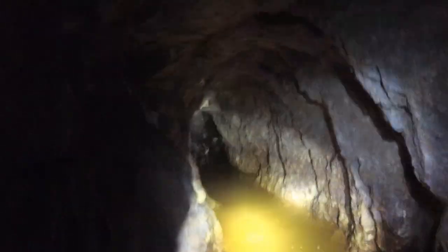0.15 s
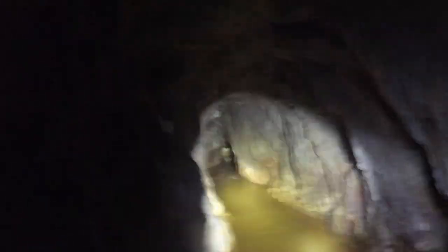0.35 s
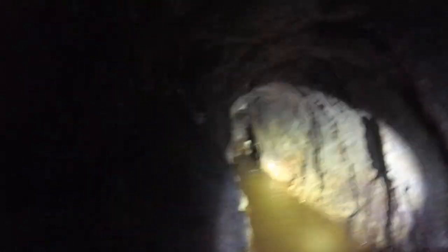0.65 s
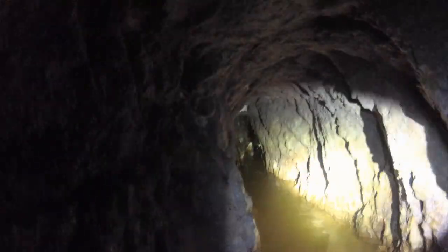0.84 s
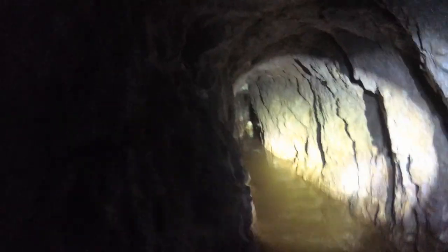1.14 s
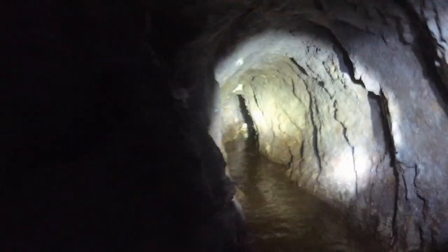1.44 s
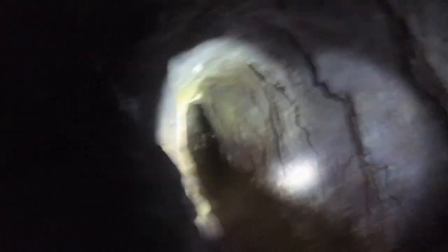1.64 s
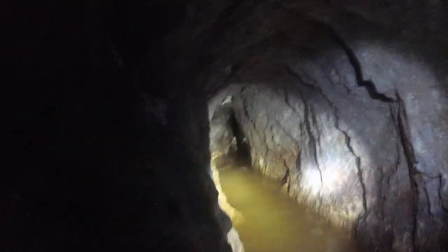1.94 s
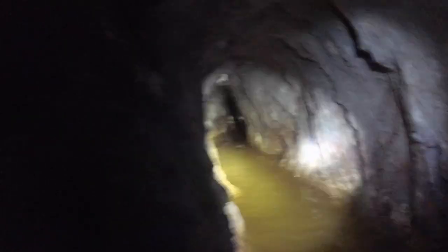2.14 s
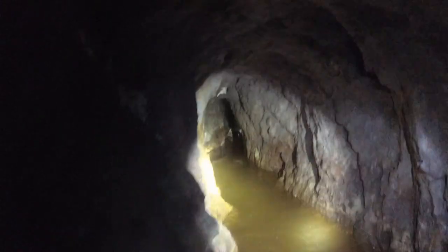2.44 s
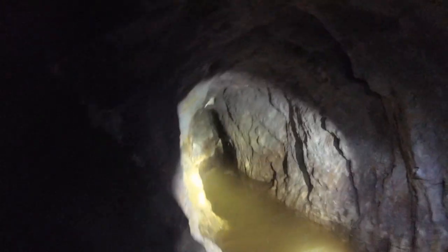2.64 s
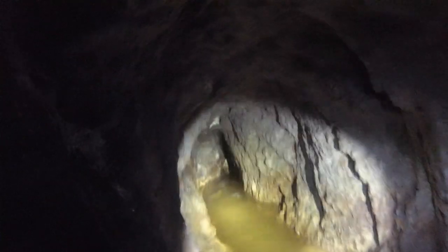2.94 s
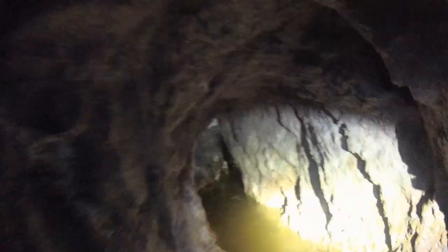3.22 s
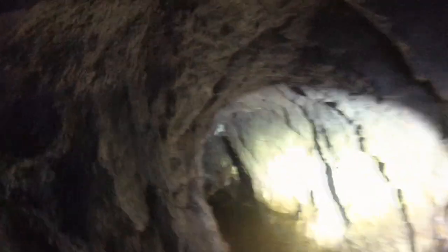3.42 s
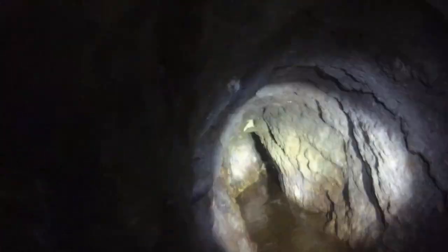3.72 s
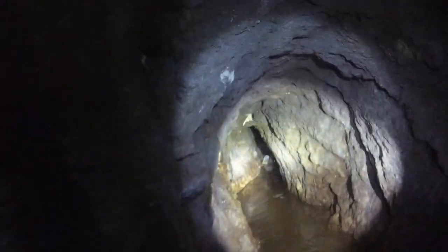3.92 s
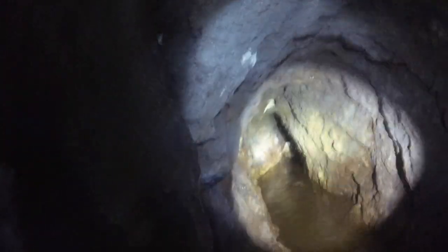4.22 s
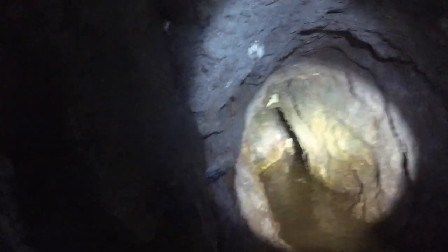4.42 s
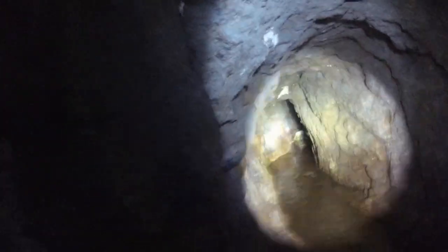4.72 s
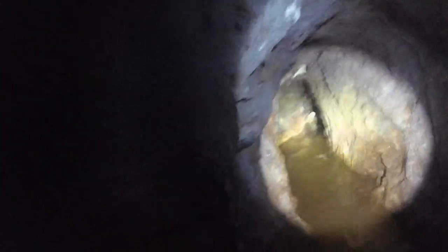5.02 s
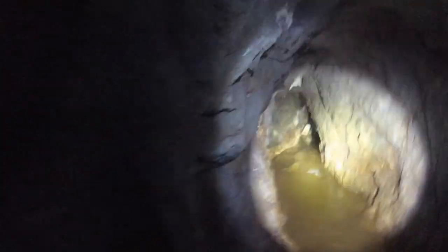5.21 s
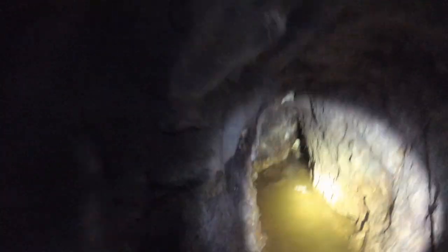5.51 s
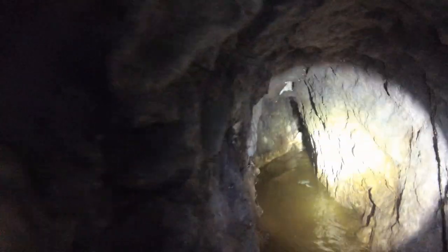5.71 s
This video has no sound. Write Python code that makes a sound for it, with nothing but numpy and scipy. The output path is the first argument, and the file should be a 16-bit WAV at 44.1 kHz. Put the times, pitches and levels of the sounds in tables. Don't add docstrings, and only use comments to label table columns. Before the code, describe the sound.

Someone wades slowly through a flooded rock tunnel, water sloshing and bubbling, while the camera case ticks, thumps and bangs loudly against rock.

```python
import sys
import numpy as np
from scipy import signal
from scipy.fft import rfft, irfft, next_fast_len
from scipy.io import wavfile
from scipy.ndimage import uniform_filter1d, map_coordinates

SR = 44100
rng = np.random.default_rng(int(sys.argv[2]) if len(sys.argv) > 2 else 0)


def volts_from_db(level):
    exponent = np.asarray(level, float) / 20
    return 10 ** exponent


def put_to_file(sound):
    columns = np.atleast_2d(sound).T
    safe = np.clip(columns, -1, 1)
    whole_steps = np.round(safe * 32767)
    wavfile.write(sys.argv[1], SR, whole_steps.astype(np.int16))


N = 258426


def unit(x):
    return x / np.sqrt(np.mean(x ** 2) + 1e-20)


def along(points, hz):
    f, v = np.transpose(points)
    return np.interp(np.log(hz + 1), np.log(f + 1), v)


def curves(rows):
    s, *columns = np.transpose(rows)
    return [np.interp(np.arange(N) / SR, s, column, -120, -120) for column in columns]


def filtered(x, response):
    m = next_fast_len(N + SR // 2)
    return irfft(rfft(x, m) * response(np.fft.rfftfreq(m, 1 / SR)), m)[..., :N]


def band(hz, lo_hz, hi_hz):
    return 1 / np.sqrt((1 + (lo_hz / (hz + 1)) ** 8) * (1 + (hz / hi_hz) ** 8))


def resonance(f, hz, width_hz):
    return 1j * f * width_hz / (hz * hz - f * f + 1j * f * width_hz)


def ring(t, hz, t60, attack):
    return np.sin(2 * np.pi * hz * t) * volts_from_db(-60 * t / t60) * (1 - np.exp(-t / attack))


def add(track, s, x):
    start = round(s * SR)
    track[..., start:start + x.shape[-1]] += x


def swell(s, length, rise, fall):
    t = np.arange(N) / SR - s
    return (1 - np.exp(-np.maximum(t, 0) / rise)) * np.exp(-np.maximum(t - length, 0) / fall)


def evened(x, span_s):
    power = abs(uniform_filter1d(x ** 2, round(span_s * SR)))
    return x / np.sqrt(power + 0.033 * np.mean(x ** 2))


def patchy(x, depth_db):
    z = signal.stft(x, nperseg=512)[2]
    field = uniform_filter1d(rng.standard_normal(z.shape), size=4, axis=0)
    field = uniform_filter1d(field, size=9, axis=1)
    return signal.istft(z * volts_from_db(depth_db * unit(field)), nperseg=512)[1][:N]


def bubbles(count, centre_hz, spread, cycles, scatter_db):
    when, pitch, size = rng.random((3, count))
    hz = (centre_hz * np.exp(spread * (2 * pitch - 1)))[:, None]
    k = np.arange(int(3 * 12 * SR / centre_hz))
    turns = hz * k / SR
    rising = np.sin(2 * np.pi * turns * (1 + 0.047 * turns / cycles))
    shape = rising * np.exp(-turns / cycles) * (1 - np.exp(-turns))
    grains = shape * np.sqrt(hz) * volts_from_db(-scatter_db * np.log(size + .01))[:, None]
    places = (when * N).astype(int)[:, None] + k
    return unit(np.bincount(places.ravel(), grains.ravel())[:N])


# (frequency [Hz], t60 [s])
TUNNEL_DECAY = [(300, 0.75), (1500, 0.48), (5000, 0.44), (14000, 0.41)]


def tunnel(x):
    hz, t, z = signal.stft(rng.standard_normal(SR // 2), SR, nperseg=256)
    decay = volts_from_db(-60 * t / along(TUNNEL_DECAY, hz)[:, None])
    tail = signal.istft(z * decay, SR, nperseg=256)[1]
    return signal.fftconvolve(x, tail / np.linalg.norm(tail))[:N]


# (frequency [Hz], level [dB per Hz])
WATER_COMMON = [(160, -22), (280, -9), (471, 0), (567, -1), (834, 4), (1040, -12), (1250, -6.5),
                (1360, -13.5), (2070, -10.5), (3140, -21.5), (3600, -15.5), (5900, -20.5), (6700, -34),
                (8600, -48), (9850, -41.5), (15500, -35.5)]
# (frequency [Hz], level [dB per Hz])
WATER_OPPOSITE = [(160, -45), (280, 5), (567, -32.5), (1060, -68), (1250, -21.5), (1400, -22), (2000, -17),
                  (2400, -15), (3480, -6), (4700, -4.5), (5380, -2), (5950, -3.5), (7280, 0), (9370, -25.5),
                  (15500, -34)]
# (frequency [Hz], width [Hz], level [dB])
CAVITIES = [(1230, 27, -1), (1505, 140, 5.5), (2040, 53, -12), (2210, 160, 1.5), (3507, 140, 6)]
# (frequency [Hz], width [Hz], level [dB])
CROSS_MODES = [(1250, 160, 14), (3400, 390, 1.5), (5370, 310, -5), (14200, 500, 5)]


def through_case(source, level_db, lo_hz, hi_hz, linked):
    def lift(f, modes):
        peaks = sum(volts_from_db(db) * abs(resonance(f, hz, width)) for hz, width, db in modes)
        return (1 + peaks) * band(f, lo_hz, hi_hz)

    source = unit(patchy(source + volts_from_db(-7.5) * tunnel(source), depth_db=2.0))
    turn = np.arcsin(np.clip(linked, 0, 1))
    other = np.sin(turn) * source + np.cos(turn) * source[::-1]
    mid = filtered(source, lambda f: lift(f, CAVITIES) * volts_from_db(along(WATER_COMMON, f)))
    side = filtered(other, lambda f: -1j * lift(f, CROSS_MODES) * volts_from_db(along(WATER_OPPOSITE, f) - 13.5))
    return volts_from_db(level_db) * np.array([mid, side]) / np.std(mid)


# (time [s], strength [dB], spray over splash [dB])
STRIDE_SWELLS = [(0.0, -53.5, -5), (0.41, -45.5, -8), (0.57, -42, -6), (0.82, -42, -3), (1.19, -41.5, -2),
                 (1.43, -46, -3), (2.17, -49.5, -2.5), (2.41, -46.5, -0.5), (2.64, -38.5, -3),
                 (3.12, -40, -4.5), (3.48, -47.5, -4.5), (3.97, -52, -13), (4.24, -46.5, -7),
                 (4.45, -38, -4), (4.72, -36, -4), (5.19, -49.5, -4), (5.63, -40, -6), (5.86, -39, -3.5)]
# (time [s], lift [dB], length [s])
WAVE_SLAPS = [
    (0.599, 4.5, 0.025),
    (2.453, 3.5, 0.071),
    (2.836, 2.5, 0.047),
    (2.952, 1.5, 0.018),
    (3.103, 7, 0.064),
    (3.19, 2, 0.017),
    (4.672, 7, 0.031),
    (5.271, -4, 0.087),
    (5.707, 2.5, 0.11),
]


def water():
    slap_db = sum(db * swell(s, length, 0.0062, 0.024) for s, db, length in WAVE_SLAPS)
    strength_db, lift_db = curves(STRIDE_SWELLS)
    over_usual_db = strength_db + 44
    slosh_db = -53 + 1.07 * over_usual_db + slap_db
    splash_db = strength_db + slap_db - lift_db / 2
    spray_db = strength_db + slap_db + lift_db / 2
    fizz_db = -60 + over_usual_db + 0.38 * lift_db + slap_db

    def rush(db):
        return volts_from_db(db) * rng.standard_normal(N)

    slosh = bubbles(count=900, centre_hz=600, spread=0.667, cycles=4.66, scatter_db=-0.5) + rush(-44)
    splash = bubbles(count=3000, centre_hz=1411, spread=0.411, cycles=3.22, scatter_db=1.0) + rush(3.2)
    spray = bubbles(count=6000, centre_hz=3228, spread=0.766, cycles=4.8, scatter_db=-1.5) + rush(6.3)
    fizz = bubbles(count=9000, centre_hz=10500, spread=0.31, cycles=5.4, scatter_db=-4.0) + rush(1.5)
    return (through_case(slosh, slosh_db, 240, 730, linked=0.28)
            + through_case(splash, splash_db, 1080, 2060, linked=0.5)
            + through_case(spray, spray_db, 1760, 5700, linked=0.54)
            + through_case(fizz, fizz_db, 10800, 18300, linked=0.24))


# (frequency [Hz], level [dB per Hz])
HISS_COLOUR = [(200, -9), (1000, -7.5), (3000, -15), (6000, -8.5), (7600, -10.5), (11000, -11.5),
               (15000, -9)]


def hiss():
    return volts_from_db(-57) * unit(filtered(rng.standard_normal((2, N)), lambda f: volts_from_db(along(HISS_COLOUR, f))))


# (frequency [Hz], level [dB per Hz])
RUMBLE_COLOUR = [(12, -40), (20, 8), (48, -4), (91, -1), (177, -6), (243, 0.5), (330, -9.5), (430, -34),
                 (730, -120)]


def rumble():
    pair = filtered(rng.standard_normal((2, N)), lambda f: volts_from_db(along(RUMBLE_COLOUR, f)))
    unrest = map_coordinates(rng.standard_normal(200), [np.arange(N) * 25 / SR])
    return volts_from_db(-52 + np.array([3 * unrest, np.full(N, -16)])) * unit(pair)


def whine():
    frame_rate, start_s = 29.97, 0.001
    turn = 2 * np.pi * frame_rate * (np.arange(N) / SR - start_s)
    tone = filtered(rng.standard_normal(N), lambda f: resonance(f, 14120, 250) ** 2)
    chirps = evened(tone, .01) * np.exp(1.6 * np.cos(turn))
    return volts_from_db(-69.5 + np.array([[-4], [0]])) * unit(chirps)


# (time [s], peak [dB], body [dB], edge [dB])
MOUNT_TICKS = [(0.338, -17.5, -7, -32), (0.4028, -2.5, -14, -14), (0.6813, -5.5, -17, -13),
               (0.8915, -16.5, -4.5, -24), (1.0911, -10, -10.5, -19), (1.1661, -5, -12.5, -14),
               (1.4034, -18.5, -3.5, -39), (1.784, 1, -15.5, -16), (2.0415, -1.5, -13, -15),
               (2.101, -6.5, -13, -12), (4.6856, -19.5, -4, -14), (5.443, -16.5, -7, -23),
               (5.5341, -25, 0.2, -44)]
# (time [s], peak [dB], body [dB], edge [dB])
MOUNT_CRACKS = [(0.14, -24, -5, -1), (1.6787, 0, -9.5, -11), (1.7115, -50, 22, -20), (1.7188, -35, 18, -20),
                (1.7697, -54, 15, -20), (1.937, -52, 20, -20), (3.6422, -43, 33, -26),
                (4.8885, -40, 27, -21), (5.0362, -33, 24.5, -20), (1.7438, -39.5, 25.5, -8),
                (1.8193, -29, -9, -26), (1.9763, -38, 20, -13), (3.6489, -17, 13, -10),
                (3.7071, 8, -16.5, -7), (4.8254, 0, 5.5, -40), (4.893, -18, 12.5, -12),
                (4.9326, -22, 15, -6), (4.9895, -34.5, 23, -8), (5.025, 1.6, -40, -10.5),
                (3.754, -30, -12, -30), (3.686, -34, -12, -25)]
# (frequency [Hz], common [dB], opposite [dB], opposite lead [turns], t60 [s])
LATCH_MODES = [(3640, 0, -30, 0.86, 0.018), (3825, -32, -1, 0.92, 0.011), (3970, -31, -11, 0.78, 0.0098),
               (4350, -18, -33, 0.46, 0.011), (3250, -23, -10.5, 0.94, 0.008),
               (2776, -12, -22, 0.18, 0.018), (11250, -25, -32, 0.34, 0.0046),
               (13300, -21, -30, 0.39, 0.003)]
# (frequency [Hz], common [dB], opposite [dB], opposite lead [turns], t60 [s])
FLANK_MODES = [(4850, -13.5, -20, 0.05, 0.0045), (5350, -13.5, -8.5, 0.056, 0.0068),
               (5800, -16, -9, 0.05, 0.0054), (6540, -21.5, -12, 0.043, 0.0063),
               (7700, -21, -26, 0.045, 0.0037)]
# (frequency [Hz], common [dB], opposite [dB], opposite lead [turns], t60 [s])
SHELL_MODES = [(1408, 6, -37, 0.3, 0.015), (2126, 3, -11, 0.36, 0.021), (780, 3, -31, 0.29, 0.0095),
               (1859, -2, -11, 0.26, 0.031)]


def ticks():
    out, t = np.zeros((2, N + SR)), np.arange(SR // 16) / SR
    shut = 0.18 + 0.94 * np.exp(-(t / 0.0042) ** 4)
    for s, db, body_db, edge_db in MOUNT_TICKS + MOUNT_CRACKS:
        parts = ((LATCH_MODES, db - 6.5, shut, 1), (FLANK_MODES, db - 6.0, -shut, -1),
                 (SHELL_MODES, db + body_db - 9.0, 1, 1))
        for modes, level_db, fade, sense in parts:
            for k, (hz, mid_db, side_db, lead, t60) in enumerate(modes):
                scatter_db = rng.normal(0, 0.8)
                drift = 1 + 0.004 * rng.standard_normal()
                late = np.maximum(t - [[lead / hz + 0.000517], [.0005]], 0)
                gain = volts_from_db(level_db + np.array([[mid_db], [side_db]]) + scatter_db)
                add(out, s, sense ** k * fade * gain * ring(late, hz * drift, t60, 0.0001))
        burst = rng.standard_normal((2, len(t) + 1))
        bright_db = db + edge_db + np.array([[-6.0], [-12.0]]) - 60 * t / 0.0017
        add(out, s + .0005, volts_from_db(bright_db) * np.diff(burst))
        add(out, s + 0.00021, volts_from_db(db - 55 - 60 * t / 0.014) * (burst[:, 1:] + burst[:, :-1]))
    steep = signal.butter(14, 15000, fs=SR, output="sos")
    return signal.sosfilt(steep, out[:, :N])


# (time [s], peak [dB], pitch [Hz])
HAND_SWAYS = [(0.151, -42, 242), (0.249, -35.5, 188), (0.307, -29, 226), (0.46, -33.5, 246),
              (0.571, -37.5, 317), (0.791, -32, 248), (0.831, -39, 181), (1.247, -31.5, 220),
              (1.477, -31, 214), (1.525, -36, 217), (1.592, -30, 260), (1.619, -28, 220), (2.006, -36, 201),
              (2.163, -35, 228), (2.181, -36, 230), (2.566, -35.5, 243), (2.614, -44, 250),
              (2.992, -33, 236), (3.156, -40, 240), (3.318, -35, 223), (3.35, -39, 220),
              (3.584, -34.5, 206), (4.173, -31.5, 226), (5.143, -30, 232), (5.2, -29, 234),
              (5.31, -33.5, 222), (5.358, -38, 250), (5.707, -33.5, 218)]
# (pitch [Hz], delay [s], swing back [dB])
TICK_ROCKS = [(250, .028, -20), (252, .03, -11), (253, .035, -10), (235, .033, -8), (252, 0.026, -5),
              (240, .035, -8), (230, .03, -20), (250, .03, -12), (250, 0.0334, -13), (240, .03, -14),
              (220, .03, -19), (250, 0.0296, -25), (260, .028, -13)]
# (time [s], peak [dB], pitch [Hz], t60 [s])
WALL_THUMPS = [(1.632, 0.5, 247, 0.024), (1.682, -26, 242, 0.03), (1.7185, -7, 239, 0.031),
               (1.7335, -14, 313, 0.015), (1.741, -8, 260, 0.014), (1.775, -22, 260, 0.04),
               (1.838, -12, 232, 0.034), (1.93, -8.5, 260, 0.028), (1.976, -25, 233, 0.04),
               (2.033, -13.5, 253, 0.037), (2.138, -25, 230, 0.051), (2.231, -23.5, 206, 0.04),
               (3.634, -15.5, 171, 0.034), (3.648, 2, 268, 0.012), (3.6825, -15, 180, 0.03),
               (3.695, -32, 237, 0.023), (3.763, -28, 231, 0.028), (3.775, -11, 189, 0.032),
               (4.207, -4, 226, 0.039), (4.303, -19.5, 233, 0.033), (4.843, -10, 253, 0.034),
               (5.158, -13, 240, 0.037), (5.25, -11.5, 206, 0.023)]
# (time [s], peak [dB], pitch [Hz])
SHELL_KNOCKS = [(1.636, -12.5, 513), (1.677, -19, 1510), (1.72, -18, 640), (1.746, -26, 1480),
                (1.759, -30, 1290), (1.772, -20, 666), (1.841, -24.5, 600), (1.869, -36, 695),
                (1.921, -40, 570), (1.943, -22.5, 1250), (1.977, -22, 660), (2.034, -18, 689),
                (2.141, -26.5, 1238), (3.648, -3, 1147), (3.699, -8, 643), (3.762, -27, 715),
                (4.205, -32, 620), (4.3, -27, 640), (4.8245, 24.5, 701), (4.828, 13, 1027)]


def blows():
    out, t = np.zeros(N + SR), np.arange(SR // 5) / SR
    bumps = WALL_THUMPS + [(*sway, 0.068) for sway in HAND_SWAYS]
    thumps = [(*bump, -5.5 - 0.64 * max(bump[1] + 15, 0)) for bump in bumps]
    for (s, db, body_db, _), (rock_hz, back_s, back_db) in zip(MOUNT_TICKS, TICK_ROCKS):
        rock_db = db + body_db - 0.5
        back_hz = rock_hz * (1 + 0.02 * rng.standard_normal())
        thumps.append((s - 0.0012, rock_db, rock_hz, 0.055, -18))
        thumps.append((s + back_s, rock_db + back_db, back_hz, 0.047, -18))
    air = ring(t, 81.5, 0.07, 0.012) + volts_from_db(-10.0) * ring(t, 52.0, 0.13, 0.025)
    for s, db, hz, t60, push_db in thumps:
        jolt = volts_from_db(rng.normal(-18.0, 1)) * ring(t, 1.63 * hz, 0.011, 0.0022)
        add(out, s + 0.0011, -volts_from_db(db + 2.5) * (ring(t, hz, t60, 0.002) - jolt - volts_from_db(push_db) * air))
    for s, db, hz in SHELL_KNOCKS:
        t60 = 0.027 * volts_from_db(-0.16 * db)
        partner = sum(volts_from_db(rng.normal(-10.5, 4.55)) * ring(t, hz * ratio, 1.12 * t60, 0.0036)
                      for ratio in (.62, 1.3, 1.6, 1.95))
        add(out, s, volts_from_db(db - 3.0) * (ring(t, hz, t60, 0.0027) + partner))
    return out[:N]


# (time [s], peak [dB], pitch [Hz], rise [s],
# length [s])
SHELL_RINGS = [(4.8288, 16, 264.7, 0.0021, 0.0096), (4.844, -19, 1880, 0.0036, 0.014),
               (4.847, -13, 1026, .002, 0.012), (4.852, -5, 715, 0.0045, 0.0089),
               (4.857, -9, 995, 0.0018, 0.0052), (4.891, -14, 890, 0.0021, 0.0062),
               (4.893, -3.5, 704, 0.00089, 0.0075), (4.8937, -4, 267, 0.0018, 0.011),
               (4.893, -10.5, 1990, 0.00092, 0.0081), (4.899, -5, 1066, 0.0016, 0.0055),
               (4.9, -15, 2260, 0.0019, 0.0075), (4.910, -19, 1965, 0.0016, 0.013),
               (4.9152, -2, 1006, 0.0009, .009), (4.922, -1.5, 672, 0.0019, 0.0074),
               (4.923, -17, 2200, 0.0018, 0.0037), (4.932, -2, 695, .001, 0.0085),
               (4.934, -5, 977, 0.0017, 0.007), (4.937, -28, 1910, 0.0022, 0.025),
               (4.948, -14, 687, 0.0013, 0.017), (4.943, -19, 1290, .002, 0.0052),
               (4.948, -24, 2300, .002, 0.0082), (4.953, -10, 235, 0.0049, 0.026),
               (4.955, -15, 1240, 0.0018, 0.0055), (4.962, -22, 1200, .002, 0.011),
               (4.98, -13, 280, 0.0017, 0.0059), (4.981, -24, 1050, .003, .014),
               (4.998, -15, 661, 0.0028, 0.031), (5.02, -21, 1210, .002, .004),
               (5.023, -7, 940, 0.00088, .007), (5.029, -5.5, 203, 0.003, 0.012),
               (5.034, -5, 718, .002, 0.0056), (5.035, -14, 2190, .001, 0.0031),
               (5.026, -12, 1370, 0.00091, 0.0044), (1.679, -10.5, 780, 0.00085, 0.0032),
               (1.731, -15, 1440, .001, 0.0032), (1.76, -35, 2090, .001, 0.0038),
               (1.956, -29, 920, .002, 0.0073), (3.694, -23, 1960, .002, .006),
               (3.711, -15, 700, 0.0017, 0.005), (1.924, -10.5, 203, 0.00075, 0.0054),
               (1.7184, -8.5, 670, 0.00044, 0.0035), (1.719, -17, 1220, .0005, 0.0057),
                  (1.7265, -14, 235, 0.0023, 0.011), (1.739, -19, 560, .001, .004),
                  (1.7435, -18, 1280, .001, 0.0056), (1.74, -29, 2450, .001, .005),
                  (1.754, -17, 250, 0.00091, 0.0033), (1.771, -12.5, 664, .0005, 0.0031),
                  (1.7706, -13, 260, .0005, .006), (1.786, -20, 250, .002, 0.0063),
                  (1.787, -20, 800, .001, 0.0044), (1.6775, -13, 1324, 0.00058, 0.0047),
                  (3.644, -17, 660, .0005, 0.0028), (3.6479, -4.5, 1240, 0.00123, 0.004),
                  (3.652, -6.5, 850, 0.00083, 0.0036), (3.658, -11, 455, 0.0017, 0.0068),
                  (3.663, -16, 690, .002, 0.0058), (3.6905, -15.5, 240, 0.00091, .009),
                  (3.696, -20, 685, 0.00089, 0.0088), (3.761, -20, 690, .0005, 0.0047),
                  (3.76, -16.5, 250, .0005, 0.0061), (3.779, -25, 606, .001, 0.0044),
                  (4.304, -39, 646, 0.0013, 0.01), (4.8252, 7, 670, 0.00066, 0.0071),
                  (4.83, -4, 980, 0.00091, .005), (1.983, -34, 600, .001, 0.0065),
                  (1.838, -28.5, 720, .0005, 0.0054), (2.4, -34, 1490, .001, .006),
                  (2.15, -34, 1250, .001, 0.0067), (2.051, -31, 794, .001, 0.0068),
                  (1.942, -28, 1230, .001, .007), (4.9005, -13, 560, 0.0011, 0.0062),
                  (4.939, -12, 615, 0.0015, 0.0076), (3.4, -31, 1400, .001, 0.0055),
                  (4.2065, -20, 603, 0.001, 0.0051), (5.16, -28, 530, .0005, 0.0018),
                  (5.251, -31, 540, 0.0005, 0.0026), (1.732, -16, 250, .001, 0.0072),
               (1.7598, -22, 1360, .0013, .0055), (1.9, -29, 2230, .0013, 0.0042),
              (1.731, -28, 2030, .0011, 0.0032), (1.272, -34, 250, .006, .025), (1.01, -39, 320, .015, .06),
              (0.6, -41, 300, .015, .06), (5.432, -34, 230, 0.0043, 0.01), (5.39, -41, 240, .004, .015),
              (4.9415, -16, 260, .0013, .007), (5.037, -13, 700, 0.0015, .005),
              (3.692, -25, 1260, .0013, .007), (4.683, -35, 228, .004, 0.014)]


def rings():
    out, t = np.zeros(N + SR), np.arange(SR // 12) / SR
    for s, db, hz, rise, length in SHELL_RINGS:
        damped = np.exp(-(t / length) ** 2.16)
        add(out, s, -volts_from_db(db) * ring(t, hz, 0.29, rise) * damped)
    return out[:N]


# (time [s], peak [dB], pitch [Hz], length [s])
AIR_GULPS = [(0.631, -23, 1250, 0.011), (0.846, -26.5, 1230, 0.072), (0.919, -23.5, 1477, 0.022),
             (2.497, -21, 1255, 0.022), (2.698, -23, 1258, 0.026), (2.744, -19, 1206, 0.014),
             (2.812, -26, 1390, 0.021), (2.855, -31, 2040, 0.024), (2.968, -24.5, 1330, 0.022),
             (3.127, -24, 2080, 0.016), (3.204, -23.5, 1246, 0.019), (4.536, -20.5, 1412, 0.026),
             (4.685, -43, 1430, 0.03), (4.702, -10.5, 1188, 0.013), (5.463, -19, 1202, 0.03)]


def gulps():
    out, t = np.zeros(N + SR), np.arange(SR // 8) / SR
    for s, db, hz, length in AIR_GULPS:
        u = t / length
        waver = np.cumsum(rng.normal(0, 0.071, len(t)))
        envelope = 12 * u ** 2 * np.exp(-4 * u)
        add(out, s, volts_from_db(db - 3.5) * envelope * np.sin(2 * np.pi * hz * t + waver))
    return out[:N] + volts_from_db(-0.5) * tunnel(out[:N])


# (time [s], length [s], drone [dB], rasp [dB], rasp pitch [Hz])
ROCK_SCRAPES = [(1.694, 0.014, -33, -35.5, 700), (1.722, 0.025, -22, -29.5, 716),
                (1.767, 0.021, -21.5, -33, 720), (1.851, 0.019, -35, -46, 650),
                (1.917, 0.027, -29.5, -42.5, 600), (1.969, 0.013, -22.5, -36, 720),
                (3.648, 0.01, -19, -24.5, 835), (3.68, 0.018, -19.5, -33, 620),
                (3.708, 0.0067, -23.5, -30, 660), (3.758, 0.02, -29, -42.5, 610),
                (4.833, 0.023, -20, -21.5, 740), (4.888, 0.015, -16, -21, 980),
                (4.906, 0.043, -16.5, -23, 986), (4.964, 0.02, -17, -32, 1100),
                (4.975, 0.064, -34, -31, 890), (5.018, 0.017, -21.5, -23.5, 780)]


def scrapes():
    def grit_modes(f):
        return 1.9 * resonance(f, 2170, 600) + resonance(f, 1750, 370) + 7.2 * resonance(f, 1160, 320)

    slips = rng.standard_normal((3, N)) * (rng.random((3, N)) < .05)
    drone = evened(filtered(slips[0], lambda f: resonance(f, 221.5, 134) ** 2), 0.0068)
    grit = evened(filtered(slips[1], grit_modes), 0.0044)
    out = np.zeros(N)
    for s, length, drone_db, rasp_db, hz in ROCK_SCRAPES:
        b, a = signal.iirpeak(hz, 4.5, SR)
        rasp = evened(signal.lfilter(b, a, signal.lfilter(b, a, slips[2])), 0.0027)
        drag = volts_from_db(drone_db) * drone + volts_from_db(rasp_db) * rasp + volts_from_db(rasp_db - 4) * grit
        out += swell(s, length, 0.0015, 0.0096) * drag
    return out


# (frequency [Hz], opposite minus common [dB])
BODY_LEAN = [(60, -18), (125, -25), (250, -26), (500, -23), (1000, -14), (2500, -6)]


def scene():
    soft_shell = signal.butter(12, 2450, fs=SR, output="sos")
    body = signal.sosfilt(soft_shell, blows() + rings() + scrapes() + gulps())
    lean = filtered(body, lambda f: np.exp(-1.3j) * volts_from_db(along(BODY_LEAN, f)))
    steady = filtered(water() + hiss(), lambda f: np.exp(-(f / 15200) ** 90))
    mid, side = steady + ticks() + rumble() + whine() + np.array([body, lean])
    return np.array([mid + side, mid - side])


def roll_off(x):
    return signal.sosfilt(signal.butter(12, 16240, fs=SR, output="sos"), x)


def record(dry):
    clipped = np.clip(dry, -.99, .99)
    mix = filtered(clipped, lambda f: 1j * f / (45 + 1j * f))
    return roll_off(mix)


dry = scene()
out = record(dry)
put_to_file(out)
```